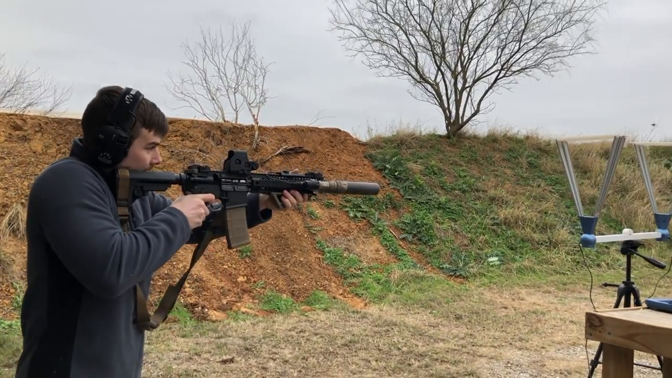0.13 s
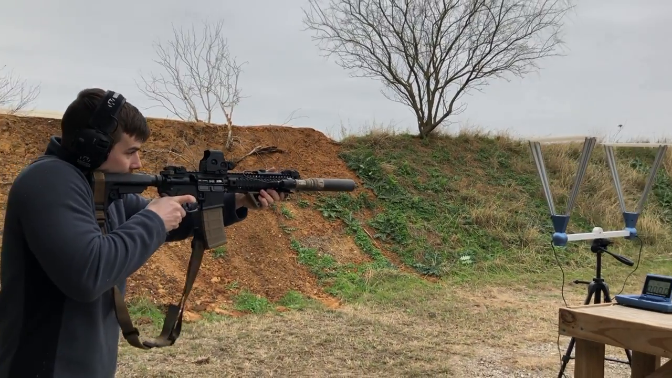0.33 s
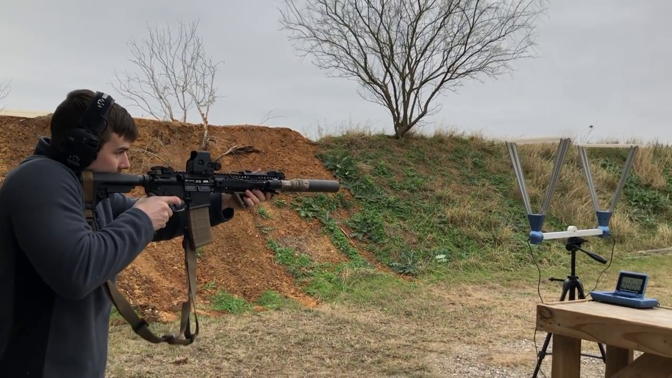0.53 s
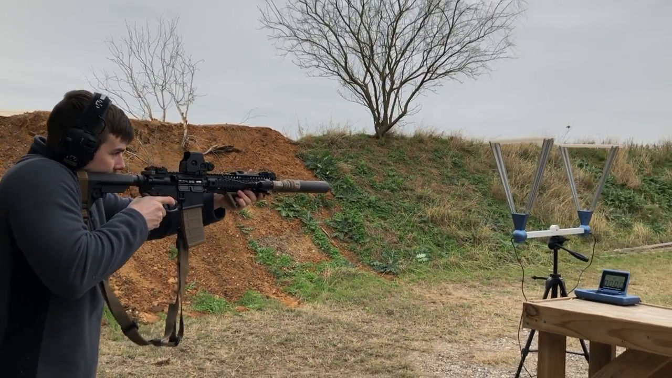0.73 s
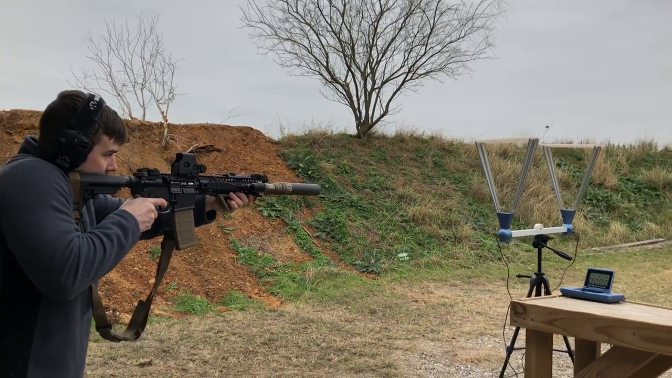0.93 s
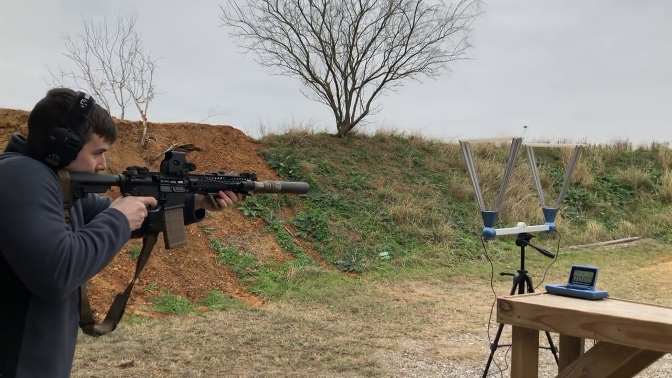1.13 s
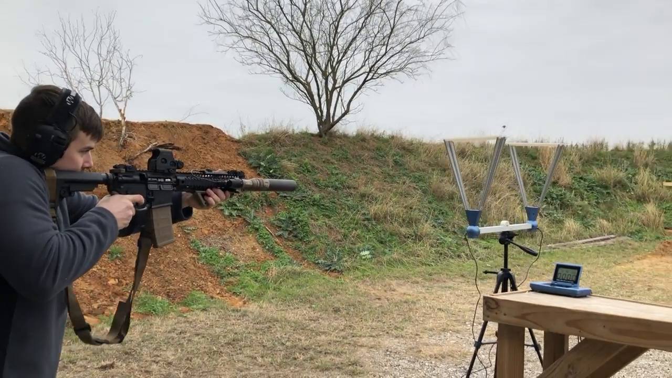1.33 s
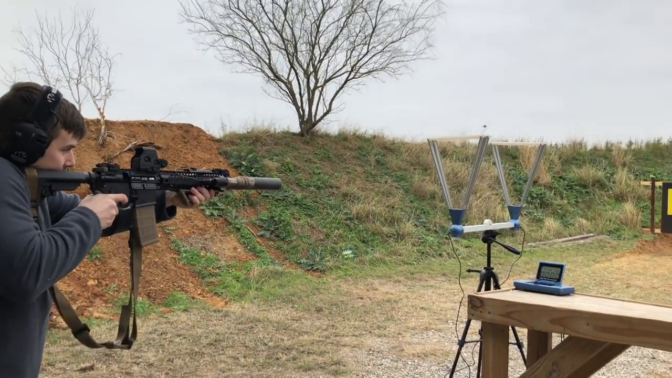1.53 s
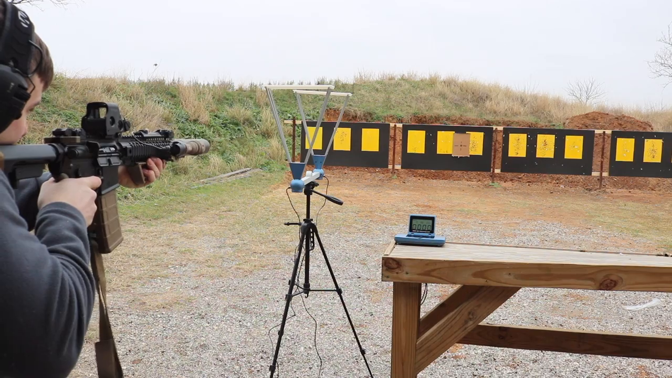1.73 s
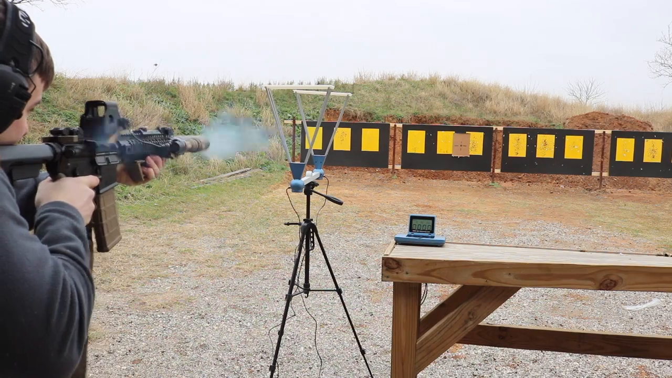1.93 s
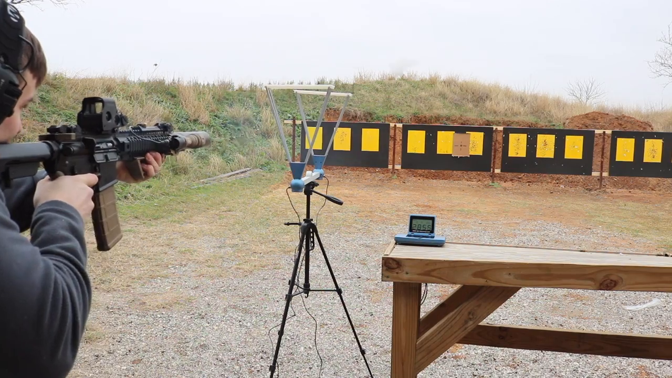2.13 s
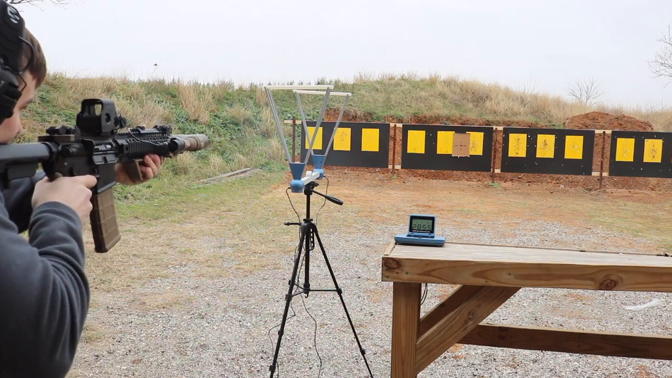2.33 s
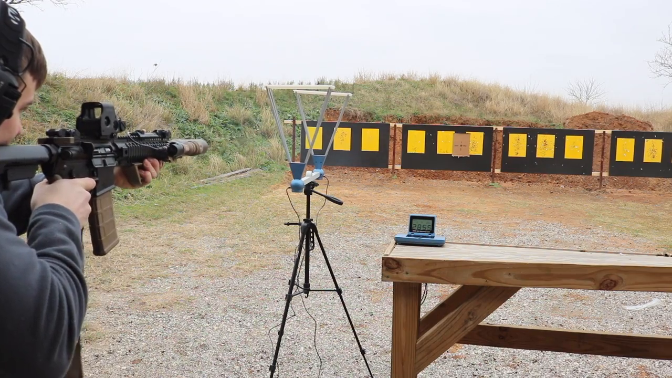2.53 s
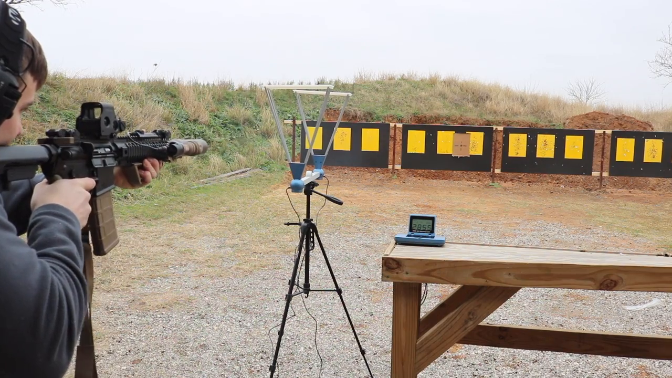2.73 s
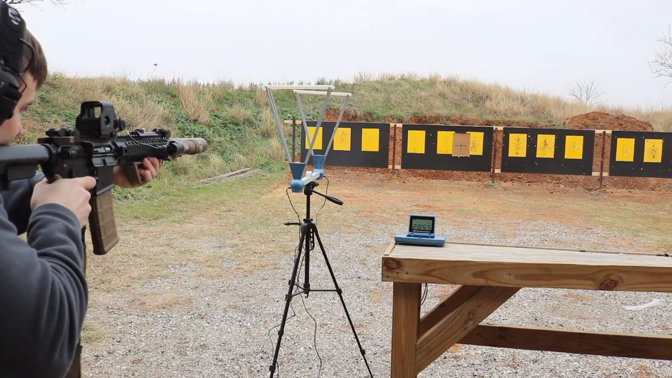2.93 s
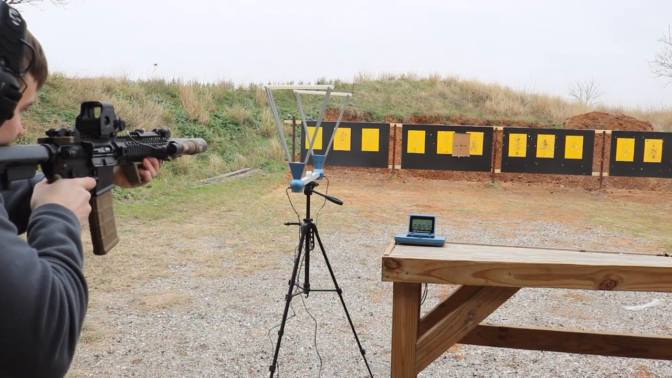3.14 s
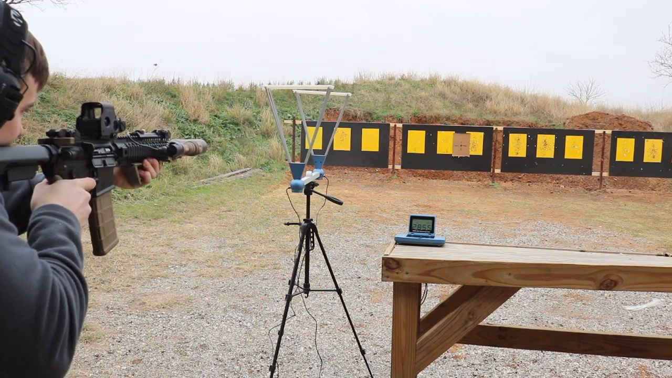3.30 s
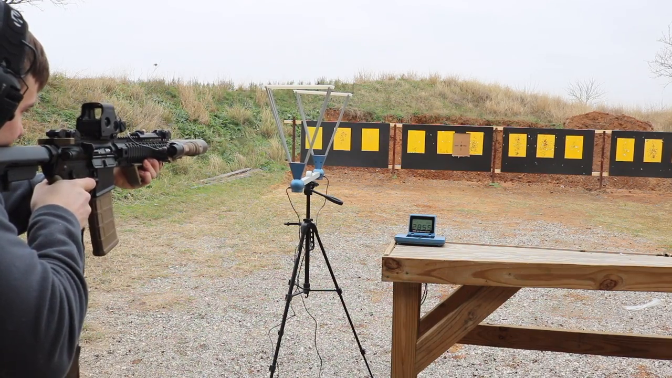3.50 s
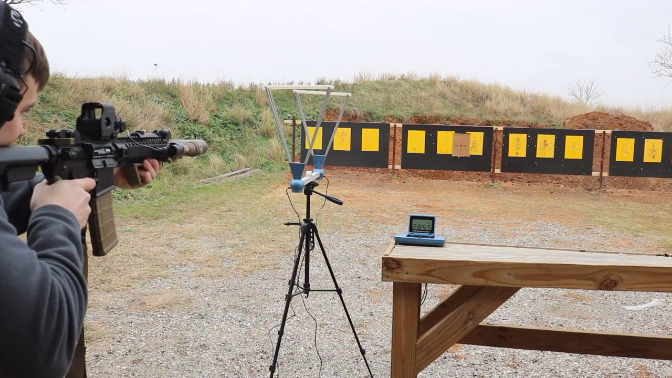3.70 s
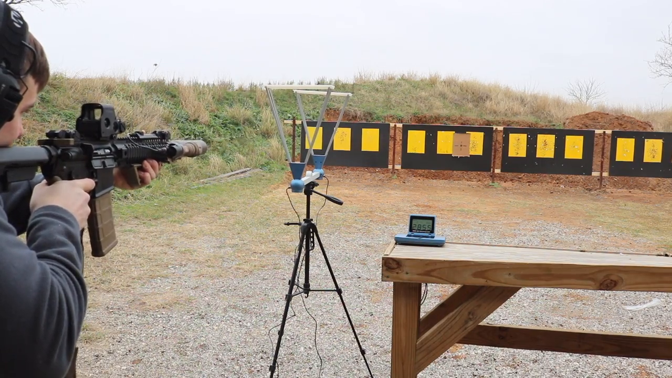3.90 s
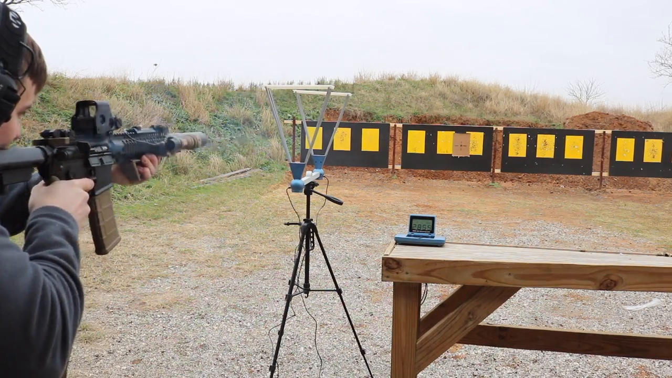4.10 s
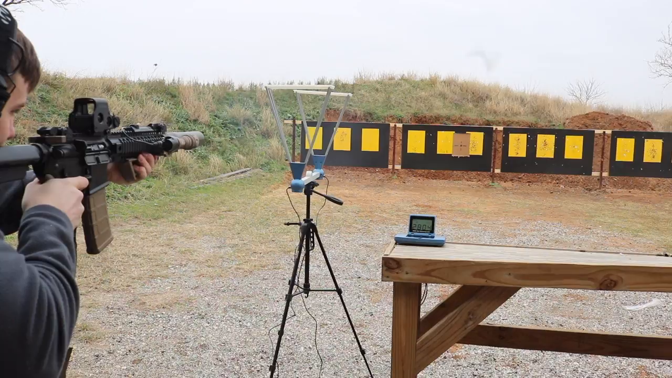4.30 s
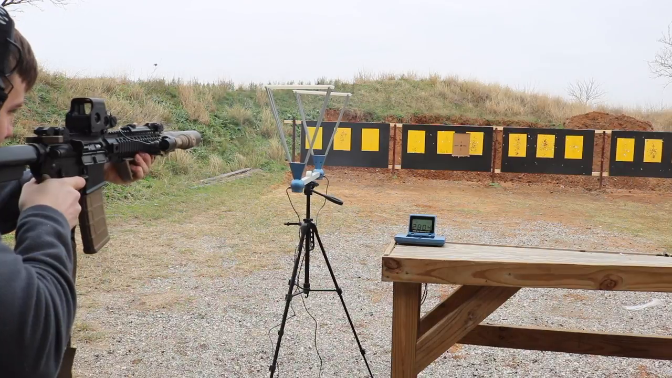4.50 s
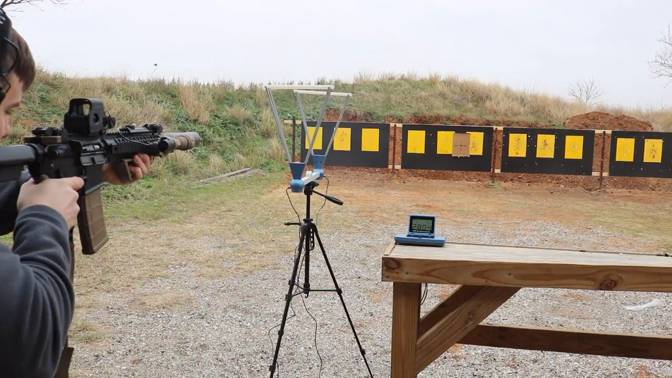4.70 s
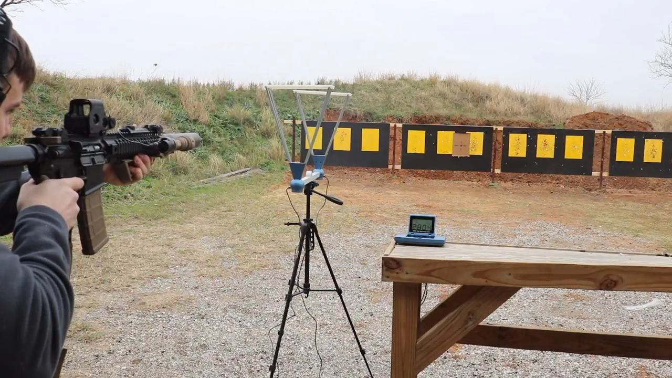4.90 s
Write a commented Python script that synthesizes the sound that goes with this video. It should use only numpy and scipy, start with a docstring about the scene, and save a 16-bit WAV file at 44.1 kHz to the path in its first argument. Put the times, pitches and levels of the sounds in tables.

```python
"""Two suppressed rifle shots at an outdoor range, heard from beside the shooter.
Each is a fluttering hiss of gas (noise), the slam of the bolt (a crack and damped modes), the bullet's thud in
the bank (a low push) and an echo off the berms (fading noise) over a low roll. Brass cases ring in split modes
as they land. Gear clicks, earth and wood knock, cloth rustles, reports come from other lanes and wind rushes."""
import sys
import numpy as np
from scipy import signal
from scipy.fft import rfft, irfft, next_fast_len
from scipy.io import wavfile
from scipy.ndimage import map_coordinates

SR = 44100
rng = np.random.default_rng(int(sys.argv[2]) if len(sys.argv) > 2 else 0)


def wav_record(signal):
    """Record a signal, one row per channel, as 16-bit PCM in the file named by sys.argv[1]."""
    frames = np.transpose(np.atleast_2d(signal))
    bounded = np.clip(frames, -1, 1)
    # unit amplitude maps onto the largest positive 16-bit level
    quanta = np.round(bounded * 32767).astype(np.int16)
    wavfile.write(sys.argv[1], SR, quanta)


N = 222761
TIME = np.arange(N) / SR  # s from the start of the scene
AGE = np.arange(SR // 2) / SR  # s from the start of one short sound


def amp(db):
    """Decibels to gain."""
    return 10 ** (np.asarray(db) / 20)


def unit(x):
    """Scale to rms 1."""
    return x / np.sqrt(np.mean(x ** 2) + 1e-20)


def along(points, hz):
    """Read (Hz, value) points on a log frequency axis."""
    f, v = np.transpose(points)
    return np.interp(np.log(hz + 1), np.log(f + 1), v)


def filtered(x, response):
    """Multiply the spectrum of x by a response of frequency."""
    n = x.shape[-1]
    padded = next_fast_len(n + SR // 8)
    spectrum = rfft(x, padded) * response(np.fft.rfftfreq(padded, 1 / SR))
    return irfft(spectrum, padded)[..., :n]


def wobble(rate):
    """A smooth random curve with rate knots a second."""
    knots = rng.standard_normal(int(N * rate / SR) + 4)
    return map_coordinates(knots, [TIME * rate])


def noise(colour, size, tilt_db=0, grain_db=0):
    """Coloured noise of rms 1; grain makes it a crowd of unequal little impulses."""
    grain = np.clip(rng.standard_normal(size), -3, 3)
    x = rng.standard_normal(size) * amp(grain_db * grain)
    # the tilt approaches its dB per octave well above 700 Hz
    return unit(filtered(x, lambda hz: amp(along(colour, hz) + tilt_db * np.log2(1 + hz / 700))))


def swell(rise, hold, t60, age=AGE):
    """An envelope that rises, holds and dies away by 60 dB in t60."""
    falling = np.maximum(age - rise - hold, 0)
    return np.clip(age / rise, 0, 1) ** 2 * amp(-60 * falling / t60)


def burst(colour, rise, hold, t60, tilt_db=0, split_hz=5000, treble_life=1):
    """A puff of noise whose treble, above the split, lasts treble_life times as long as its body."""
    x = noise(colour, len(AGE), tilt_db)
    body = filtered(x, lambda hz: 1 / (1 + (hz / split_hz) ** 4))
    treble = x - body
    return body * swell(rise, hold, t60) + treble * swell(rise, hold, t60 * treble_life)


def add(track, s, x):
    """Mix x into the track at s seconds, or at the start if s is negative."""
    part = track[max(round(s * SR), 0):][:len(x)]
    part += x[:len(part)]


def roll():
    """The low end of each shot builds up, then keeps rolling back from far ground, ever deeper."""
    # The low roll of the far ground. Each row: start in seconds, level in dB, t60 in seconds.
    roll_rows = [(-.45, -49, 2.6), (1.94, -38.5, 3.9), (4.05, -46.5, 7.8)]
    # Colour of the roll. Each row: frequency in Hz, relative level in dB.
    roll_colour = [(24, -53), (40, -48), (64, -17), (118, 0.5), (219, 1), (418, -6), (445, -10.5),
                   (500, -16.5), (650, -3), (1100, -120)]
    rise_s, hold_s = 0.34, 0.15
    sink_db_per_s = 9  # extra fall of the upper part
    out = np.zeros(N)
    for s, db, t60 in roll_rows:
        rumble = noise(roll_colour, N)
        deep = filtered(rumble, lambda hz: 1 / (1 + (hz / 200) ** 4))
        upper = rumble - deep
        build = np.clip((TIME - s) / rise_s, 0, 1)
        late = np.maximum(TIME - s - rise_s - hold_s, 0)
        out += build * amp(db - 60 * late / t60) * (deep + amp(-sink_db_per_s * late) * upper)
    lumps_db = 2.2 * wobble(18)
    return out * amp(lumps_db)


def background_db():
    """Lift in dB by which wind and hiss swell and sink together, as each shot dies away."""
    # Swells of the background. Each entry: start in seconds.
    swell_starts = [-0.11, 2.3, 4.48]
    lift_db, rise_s, hold_s, fall_s = 5.5, 0.31, 0.56, 0.67
    corners = np.cumsum([0, rise_s, hold_s, fall_s])
    return lift_db * sum(np.interp(TIME - s, corners, [0, 1, 1, 0]) for s in swell_starts)


def air():
    """A distant rush of wind: noise whose level drifts."""
    # Colour of the wind. Each row: frequency in Hz, relative level in dB.
    wind_colour = [(20, -20), (60, -3.5), (120, 2.5), (280, -7), (450, -5), (700, -3.5), (920, -2.5),
                   (1200, -10.5), (1600, -15.5), (4000, -20), (16000, -38)]
    rest_db = -56
    swing = 1.32  # the wind swings wider than the hiss
    drift_db = 0.55 * wobble(13)
    return amp(rest_db + swing * background_db() + drift_db) * noise(wind_colour, N)


def bounced(x, spread, share, count=8):
    """Weak copies off nearby surfaces ripple the spectrum of x; the power is kept."""
    delays = rng.uniform(spread / 10, spread, count)  # s
    comb = lambda hz: 1 + share * sum(np.exp(-2j * np.pi * hz * delay) for delay in delays)
    return filtered(x, comb) / np.sqrt(1 + count * share ** 2)


def echoes():
    """Each berm returns a swell of countless reflections; the treble fades first and a faint scatter lingers."""
    # Returns from the side berm, the target boards and the end berm. Each row: whose shot, arrival in seconds,
    # level in dB before the trim below, rise, hold and t60 in seconds, brightness in dB per octave.
    return_rows = [("far lane", -.01, -24.5, 0.0019, 0.065, 0.62, 0),
                   ("far lane", .114, -26, 0.013, 0.0085, 0.37, 2.5),
                   ("far lane", .197, -26.5, 0.0056, 0.016, 0.14, 0),
                   ("first shot", 1.935, -21, 0.056, 0.093, 0.25, 5.1),
                   ("first shot", 2.13, -37.5, 0.067, .025, .25, 9.2),
                   ("first shot", 2.06, -23, 0.073, 0.076, 1.085, 0.51),
                   ("near lane", 2.93, -28, 0.013, 0.045, 0.29, -1),
                   ("second shot", 4.08, -24.5, 0.036, 0.058, 0.65, 7.3),
                   ("second shot", 4.22, -36.5, 0.044, 0.077, .4, 9.3),
                   ("second shot", 4.19, -28, .11, 0.11, 0.99, 1.2)]
    # Colour that each shot's echo takes on. Each row: frequency in Hz, relative level in dB.
    return_colours = { "far lane": [(59, -49), (100, -19), (178, -26), (262, -6), (294, -8), (441, -3),
                      (486, -10), (535, 2), (612, -3.5), (935, 3.5), (1570, -15.5), (3150, -20),
                      (10000, -30.5), (13000, -31), (22000, -120)], "first shot": [(59, -43), (100, -35),
                      (229, -6), (266, -24), (295, -6), (433, -16.5), (524, -6.5), (583, -9.5), (910, 1.5),
                      (1520, -10.5), (2080, -8.5), (3620, -13), (10500, -38.5), (16000, -63)],
                      "near lane": [(120, -47.5), (200, -16), (316, -47), (391, -30), (552, -25),
                      (717, -2.5), (932, 0.5), (1210, -9), (1400, -12.5), (3030, -12), (3340, -27),
                      (4480, -20), (10000, -43), (13000, -75), (22000, -120)], "second shot": [(59, -46),
                      (100, -7), (163, -6.5), (415, -13.5), (513, 2), (583, -4.5), (784, 2), (1130, 0),
                      (1720, -9.5), (2040, -6), (2220, -8), (3620, -12), (7450, -29), (12700, -48),
                      (16000, -62)]}
    # Air and grass take the treble first. Each row: frequency in Hz, share of t60 as a ratio.
    life_shares = [(200, 0.85), (900, 1.15), (2500, 0.89), (5000, 0.55), (10000, 0.47)]
    # Scatter that each shot's returns leave. Each entry: level in dB relative to the return.
    linger_levels = {"far lane": -12.5, "first shot": -13.5, "near lane": -31, "second shot": -10.5}
    # Colour of that scatter. Each row: frequency in Hz, added level in dB.
    linger_colour = [(200, 3), (900, -3.5), (2000, -1.5), (3700, -2.5), (4600, -5), (10000, -12)]
    linger_t60_s, trim_db = 2.42, -1.4
    out = np.zeros(N)
    for whose, s, db, rise, hold, t60, tilt_db in return_rows:
        grains = noise(return_colours[whose], 2 * SR, tilt_db, grain_db=5.5)
        crowd = bounced(grains, spread=.025, share=.13)
        hz, age, z = signal.stft(crowd, SR, nperseg=256)
        fading = swell(rise, hold, t60 * along(life_shares, hz)[:, None], age)
        scatter_gain = amp(linger_levels[whose] + along(linger_colour, hz))[:, None]
        scatter = scatter_gain * swell(rise, hold, linger_t60_s, age)
        _, returned = signal.istft(z * np.hypot(fading, scatter), SR)
        add(out, s, amp(db) * returned)
    clumps_db = .9 * wobble(110)
    return out * amp(clumps_db + trim_db)


def cases():
    """A brass case scuffs the gravel and rings in two split modes, which beat as it tumbles."""
    # Cases landing. Each row: start in seconds, level in dB, low mode in Hz, high mode in Hz, high mode in dB
    # relative to the low, tumble (beat) in Hz, t60 in seconds, scuff in dB.
    case_rows = [(.02, -51, 11200, 15100, 0, 22, 0.82, -51),
                 (0.105, -33.5, 11009, 15251, -7, 7.8, 0.36, -63),
                 (0.532, -45, 10070, 15251, -20, 8.6, 0.38, -50),
                 (2.751, -30, 10980, 14900, 1.5, 23, 0.33, -37.5),
                 (3.009, -47.5, 11030, 14900, -7, 17, 0.57, -46),
                 (4.891, -30.5, 10770, 15079, -3.5, 20.3, 0.38, -39.5)]
    # Colour of the scuffed gravel. Each row: frequency in Hz, relative level in dB.
    gravel_colour = [(200, -35), (1000, -6), (1800, 0), (2100, 3), (2500, 2.5), (4500, 2), (8000, -5),
                     (16000, -16)]
    tone = lambda hz: np.sin(2 * np.pi * hz * AGE)
    pair = lambda hz, beat: tone(hz) - 0.62 * tone(hz + beat)
    out = np.zeros(N)
    for s, db, low_hz, high_hz, high_db, tumble, t60, scuff_db in case_rows:
        ring = pair(low_hz, tumble) + amp(high_db) * pair(high_hz, tumble)
        scuff = noise(gravel_colour, len(AGE), grain_db=6) * swell(0.00089, 0.0043, 0.31)
        add(out, s, amp(db) * ring * swell(0.0052, 0.0028, t60))
        add(out, s, amp(scuff_db) * scuff)
    return out


def contacts(rows, colour, modes, hold, ring_db):
    """Short blows: a crack of noise, and the brief ring of a heavily damped body."""
    out = np.zeros(N)
    for s, db, t60, tilt_db in rows:
        ring = 0
        for hz, level, life in modes:
            # each blow strikes the modes a little differently
            fall = amp(level + rng.normal(0, 2) - 60 * AGE / life)
            ring = ring + fall * np.sin(2 * np.pi * hz * rng.normal(1, .025) * AGE)
        crack = burst(colour, 0.00015, hold, t60, tilt_db)
        add(out, s, amp(db) * (amp(-6.0) * crack + amp(ring_db) * ring))
    return out


def knocks():
    """Earth and wood knock dully: a short crack over a few damped modes."""
    # Each row: start in seconds, level in dB before the crack and ring gains, t60 of the crack in seconds,
    # brightness of the crack in dB per octave.
    knock_rows = [(.111, -37, 0.012, -5), (.135, -21, 0.02, 0), (.4545, -26, 0.023, -5),
                  (.6665, -30.5, 0.045, 1), (.901, -32.5, 0.019, 0), (1.064, -31.5, 0.073, -10),
                  (1.483, -41.5, 0.12, -10), (1.5525, -43, 0.052, 2), (1.687, -40.5, 0.13, -2),
                  (2.0305, -34, 0.034, 19), (2.073, -15, 0.033, 8.5), (4.1630, -8, 0.019, 4.5)]
    # Colour of the crack. Each row: frequency in Hz, relative level in dB.
    earth_colour = [(40, -55), (150, -6), (400, -3), (850, 1.5), (1400, 3.5), (2500, -9), (4200, -12.5),
                    (6000, -30), (16000, -68)]
    # Modes of the ring. Each row: mean frequency in Hz, mean relative level in dB, t60 in seconds.
    earth_modes = [(1012, -1, 0.046), (1290, -8, 0.0072), (2094, -7.5, 0.071)]
    return contacts(knock_rows, earth_colour, earth_modes, hold=0.0024, ring_db=-9.5)


def clicks():
    """Trigger, bolt, sling and gear click: a very short crack over damped steel modes."""
    # Each row: start in seconds, level in dB before the crack and ring gains, t60 of the crack in seconds,
    # brightness of the crack in dB per octave.
    click_rows = [(.2594, -34.5, .015, 7), (.371, -30.5, 0.0074, 1), (.410, -19, 0.017, -6.5),
                  (.4535, -28, 0.0079, 5), (.488, -24.5, .02, -10), (.501, -21, 0.0074, 2),
                  (.5305, -22.5, 0.017, 7), (.7463, -38, 0.024, 0), (1.9255, -37.5, 0.081, -7),
                  (2.0062, -10.5, 0.027, 4.5), (2.831, -34, 0.042, -8), (3.0155, -17.5, 0.02, -1),
                  (4.0398, -30.5, 0.011, 5), (4.048, -35, 0.066, -5), (4.128, -10.5, .014, 4),
                  (4.137, -12.5, 0.032, -3), (4.152, -15, 0.021, -4), (4.8965, -32, .014, 0),
                  (5.0305, -34.5, .015, 12)]
    # Colour of the crack. Each row: frequency in Hz, relative level in dB.
    steel_colour = [(40, -40), (150, -33), (500, -12), (1100, -1.5), (1600, 2), (2400, 1.5), (4500, 2.5),
                    (7000, -1), (11000, -10), (16000, -27)]
    # Modes of the ring. Each row: mean frequency in Hz, mean relative level in dB, t60 in seconds.
    steel_modes = [(2270, -3, 0.029), (4240, 0, 0.0071), (4700, 6.5, 0.0069), (7050, 0, 0.0075)]
    return contacts(click_rows, steel_colour, steel_modes, hold=0.00032, ring_db=-13.0)


def rustle():
    """Cloth and webbing slip in small jerks: grainy noise with a quickly changing level."""
    # Clothes and sling shift. Each row: start in seconds, level in dB, rise, hold and t60 in seconds.
    rustle_rows = [(.32, -44, .04, .11, 0.24), (0.476, -31, 0.023, 0.037, 0.077),
                   (0.533, -41.5, 0.028, 0.057, 0.49)]
    # Colour of the cloth. Each row: frequency in Hz, relative level in dB.
    cloth_colour = [(59, -53), (100, -38), (324, -5), (492, -13.5), (535, -8), (1160, 3.5), (1730, -12),
                    (2000, -4), (5840, -21), (8170, -26), (15000, -46)]
    moves = sum(amp(db) * swell(rise, hold, t60, TIME - s) for s, db, rise, hold, t60 in rustle_rows)
    jerks_db = 1.8 * wobble(220)
    return moves * amp(jerks_db) * noise(cloth_colour, N, grain_db=6)


def reports():
    """Shots in other lanes arrive as puffs of noise, smeared by the banks between."""
    # Reports from near, then far lanes. Each row: start in seconds, level in dB, rise, hold and t60 in seconds.
    near_rows = [(2.909, -21.5, 0.02, 0.0033, 0.25)]
    far_rows = [(.802, -28, 0.012, 0.038, 0.22), (.888, -34, 0.002, 0.014, 0.36)]
    # Colours of near and far reports. Each row: frequency in Hz, relative level in dB.
    near_colour = [(120, -41), (200, -39), (448, -20), (883, -1), (1560, -8.5), (2380, -3), (3130, -4.5),
                   (4120, -6), (4680, -7), (6280, -12), (9750, -21), (14900, -33), (16000, -40)]
    far_colour = [(47, -48), (80, -20), (156, -23.5), (323, -11), (369, -12), (643, -9), (785, -8),
                  (917, -2.5), (1860, -28.5), (2900, -25.5), (3790, -33.5), (16000, -43.5)]
    out = np.zeros(N)
    for s, db, rise, hold, t60 in near_rows:
        add(out, s, amp(db) * burst(near_colour, rise, hold, t60, split_hz=4500, treble_life=0.22))
    for s, db, rise, hold, t60 in far_rows:
        add(out, s, amp(db) * burst(far_colour, rise, hold, t60, split_hz=3300, treble_life=0.28))
    flutter_db = 0.95 * wobble(300)
    return out * amp(flutter_db)


def muzzle():
    """The suppressor lets the gas out as a short, fluttering jet, which the gravel nearby scatters back."""
    # Gas leaving the suppressor. Each row: start in seconds, level in dB, rise and hold in seconds,
    # brightness in dB per octave.
    shot_rows = [(1.9374, -18.5, 0.016, 0.019, -0.5), (4.0673, -14.5, 0.0051, 0.021, 0.4)]
    # Colour of the gas. Each row: frequency in Hz, relative level in dB.
    gas_colour = [(40, -28), (130, -10.5), (280, -6), (480, -9), (750, -1.5), (1120, 2.5), (1550, -4.5),
                  (2000, -0.5), (3000, -1.5), (4600, -2), (5800, -6.5), (9000, -5.5), (13000, -12),
                  (16000, -19)]
    out = np.zeros(N)
    for s, db, rise, hold, tilt_db in shot_rows:
        jet = burst(gas_colour, rise, hold, t60=0.068, tilt_db=tilt_db, split_hz=3800, treble_life=0.31)
        scattered = burst(gas_colour, rise=0.013, hold=0.018, t60=0.24, tilt_db=2.0)
        add(out, s, amp(db) * jet)
        add(out, s + hold, amp(db - 20.5) * scattered)
    flutter_db = .9 * wobble(400)
    return out * amp(flutter_db)


def thuds():
    """Low thuds, each one push of about a cycle: bullets striking the bank, and one dull, deeper thump."""
    # Each row: centre in seconds, peak level in dB, frequency in Hz, half length in seconds.
    thud_rows = [(2.036, -20, 283, 0.0011), (2.0439, -10.5, 237, 0.0017), (2.074, -29, 168, 0.0032),
                 (3.25, -44.5, 63.7, 0.009), (4.1665, -15, 212, 0.0017)]
    out = np.zeros(N)
    middle = AGE.mean()
    t = AGE - middle
    for s, db, hz, length in thud_rows:
        shape = np.exp(-.5 * (t / length) ** 2)
        push = np.gradient(shape * np.sin(2 * np.pi * hz * t))  # pressure follows the change of speed
        add(out, s - middle, -amp(db) * push / push.max())
    return out


def scene():
    """Everything reaches the two close microphone ports alike."""
    rifle = muzzle() + clicks() + cases()
    downrange = thuds() + knocks() + echoes() + roll()
    mid = rifle + downrange + reports() + rustle() + air()
    return np.array([mid, mid])


def record(dry):
    """Each channel has its own hiss; the deep bass is rolled off and the band is limited."""
    # Colour of the hiss. Each row: frequency in Hz, relative level in dB.
    hiss_colour = [(30, -17), (130, 0), (400, 1), (2000, -5), (6000, 1.5), (12000, 2), (15000, 0.5),
                   (16000, -1)]
    rest_db = -58
    bass_hz, top_hz = 30, 16300
    hiss = amp(rest_db + background_db()) * np.array([noise(hiss_colour, N), noise(hiss_colour, N)])
    # the last 700 Hz below the top fade smoothly to nothing
    band_limit = lambda hz: np.sin(np.pi / 2 * np.clip((top_hz - hz) / 700, 0, 1)) ** 2
    bass_cut = lambda hz: 1j * hz / (1j * hz + bass_hz)
    return filtered(dry + hiss, lambda hz: band_limit(hz) * bass_cut(hz))


dry = scene()
out = record(dry)
wav_record(out)
```